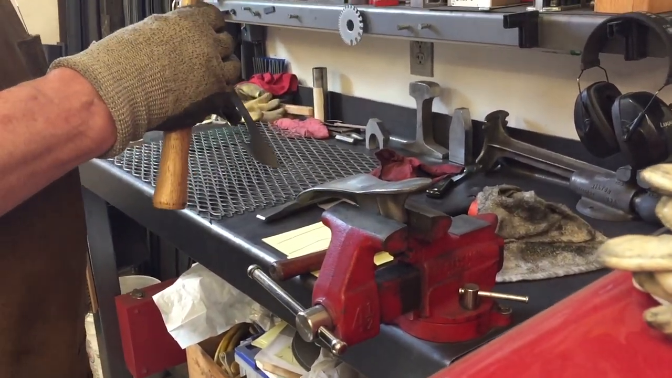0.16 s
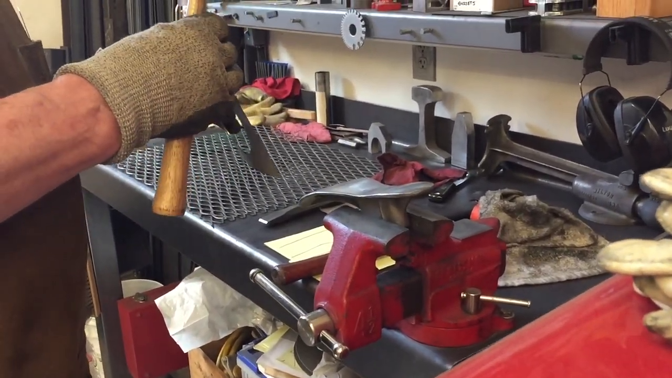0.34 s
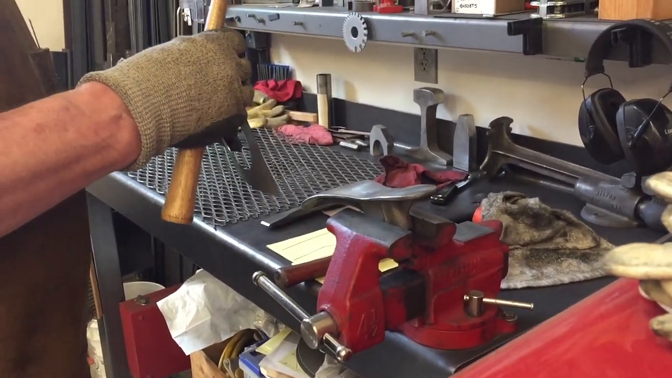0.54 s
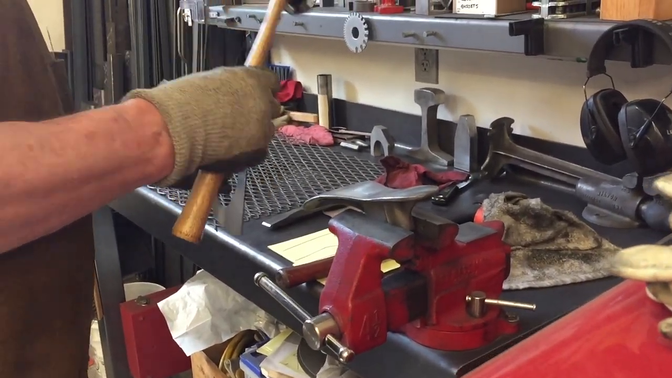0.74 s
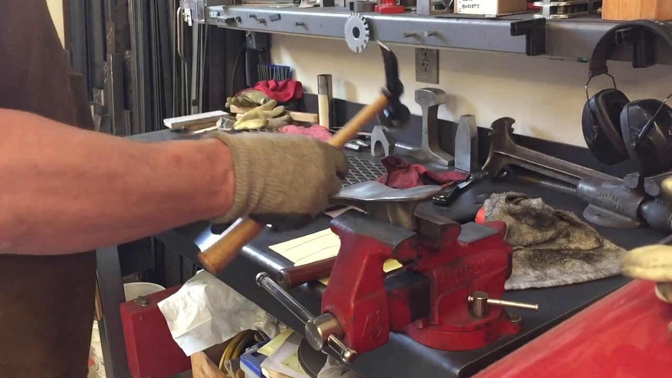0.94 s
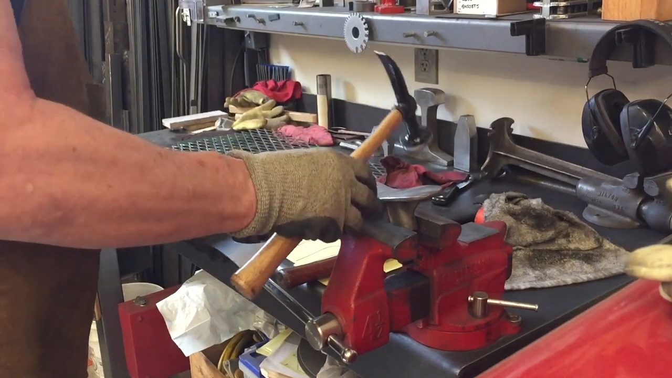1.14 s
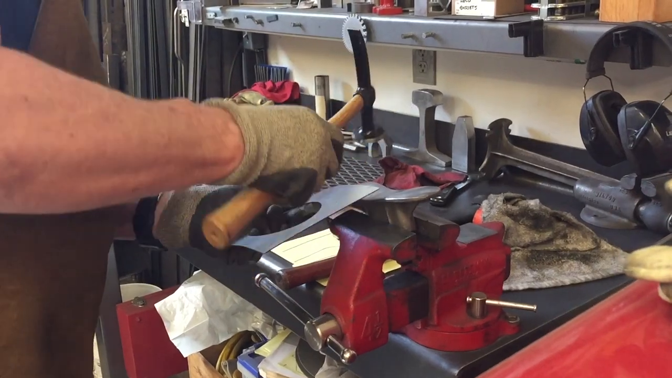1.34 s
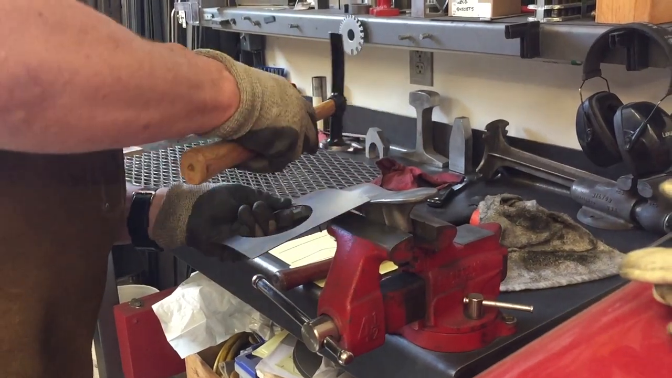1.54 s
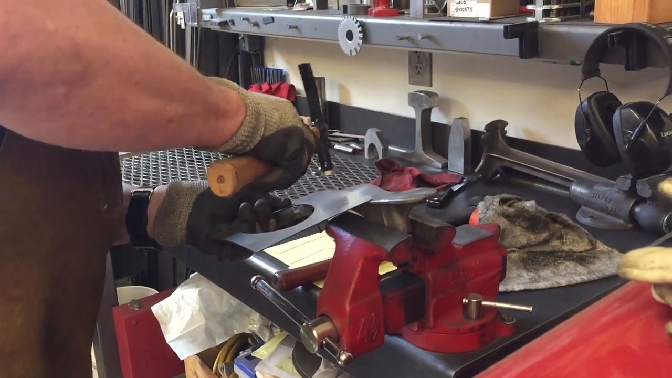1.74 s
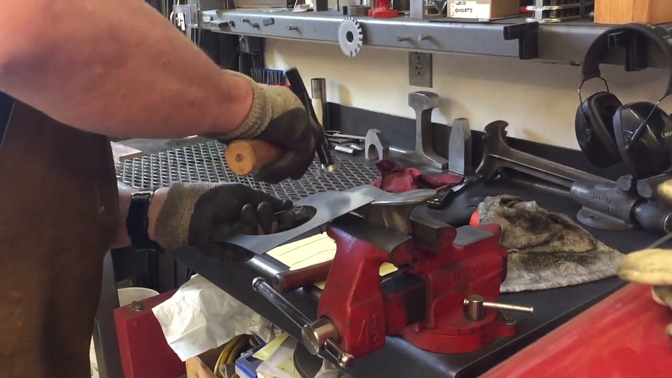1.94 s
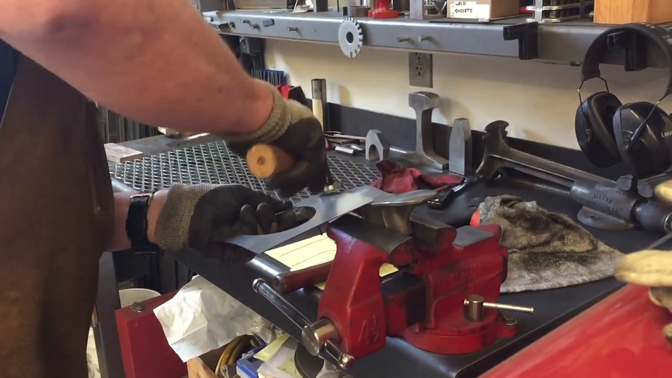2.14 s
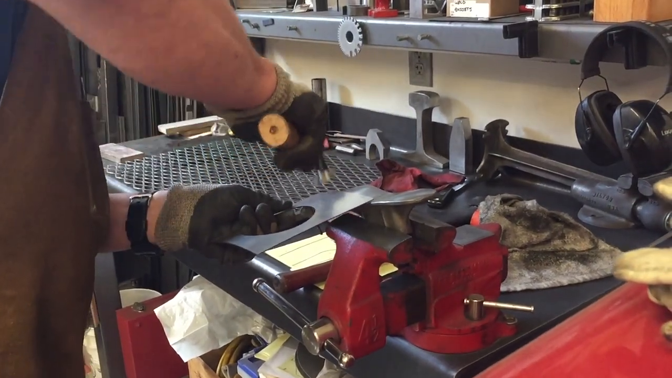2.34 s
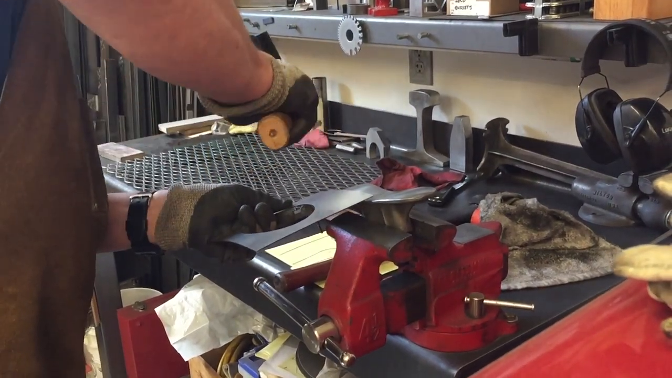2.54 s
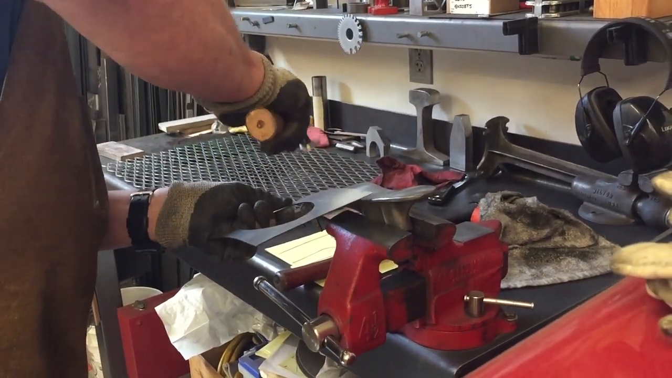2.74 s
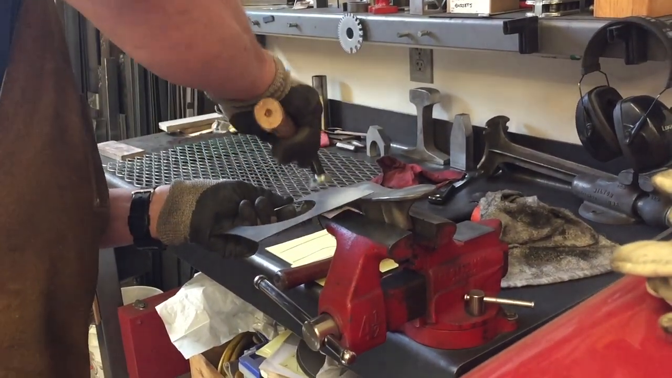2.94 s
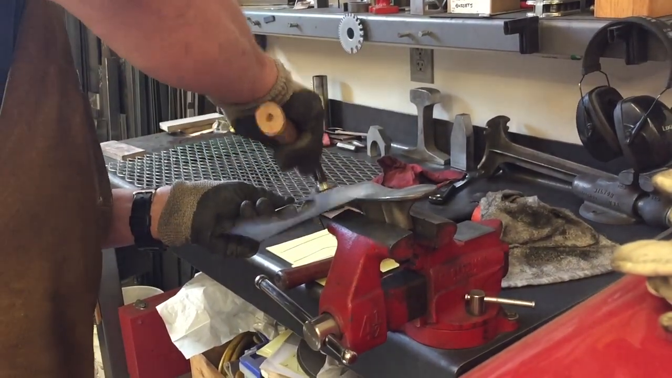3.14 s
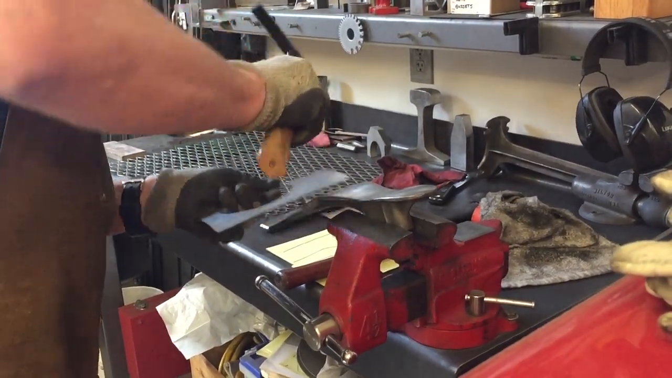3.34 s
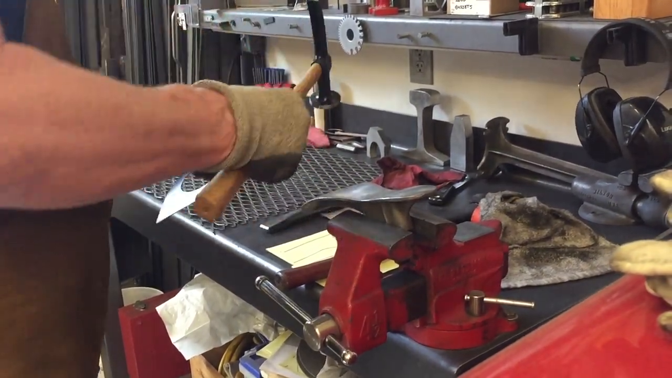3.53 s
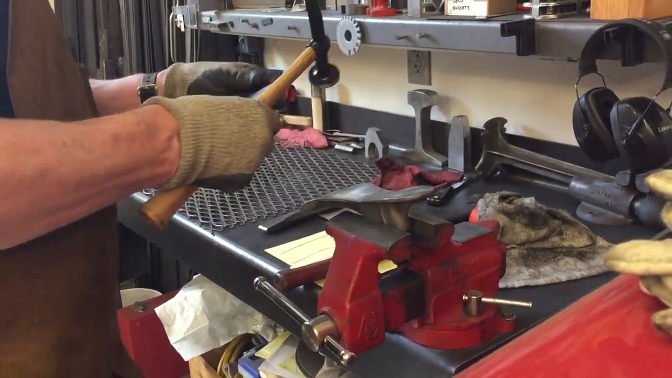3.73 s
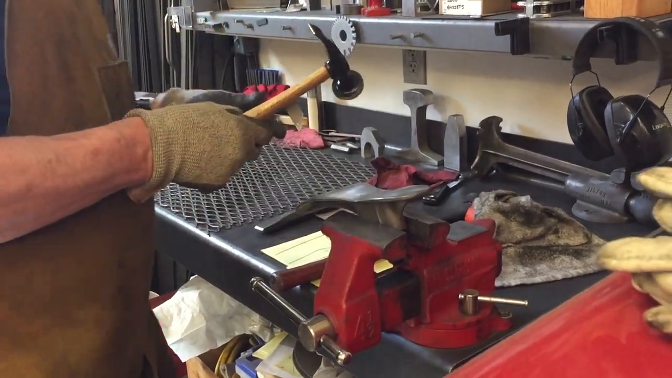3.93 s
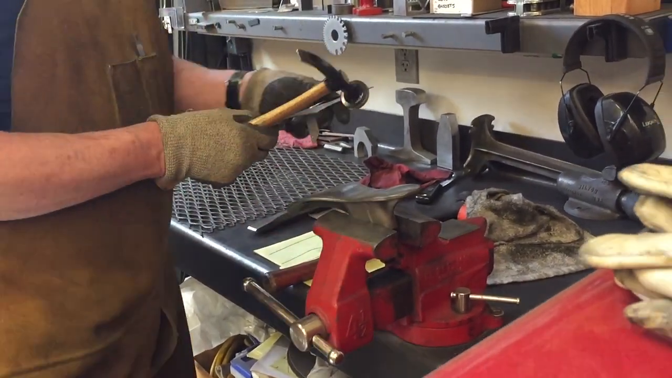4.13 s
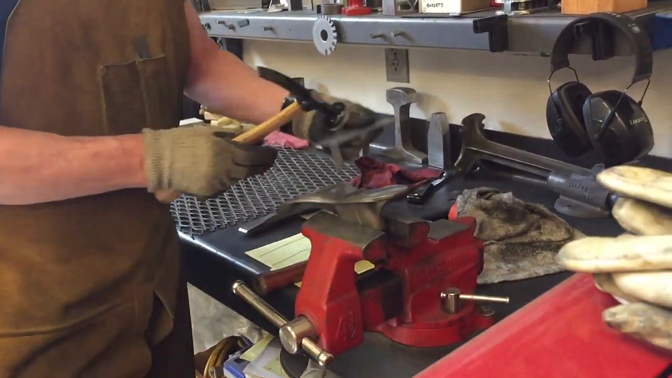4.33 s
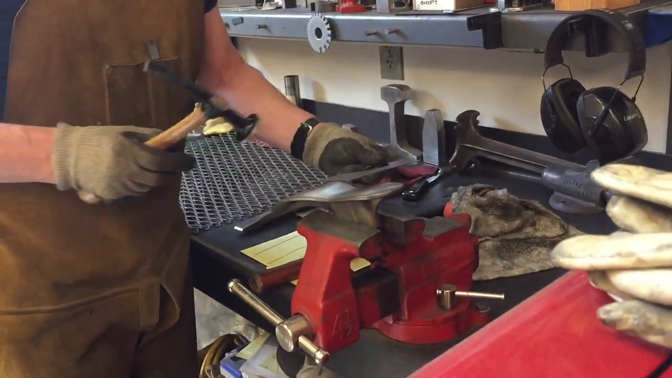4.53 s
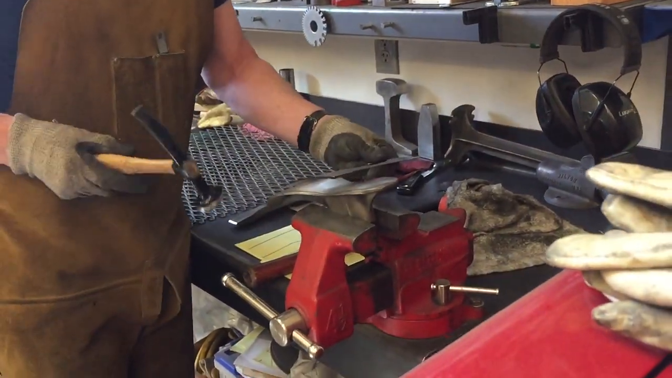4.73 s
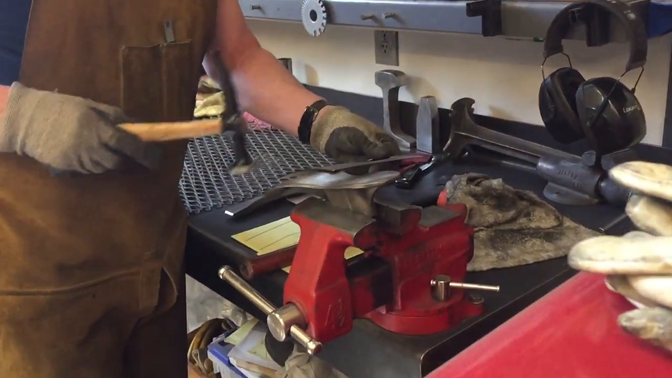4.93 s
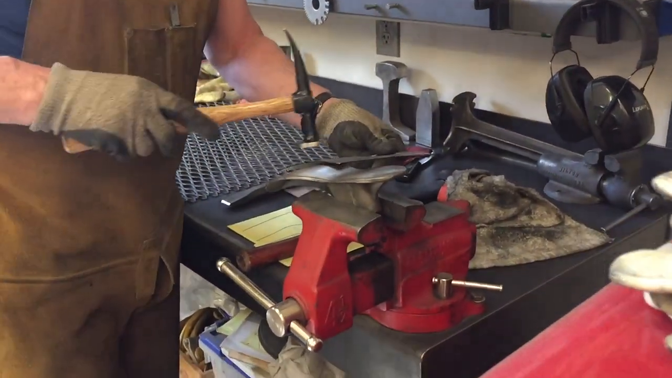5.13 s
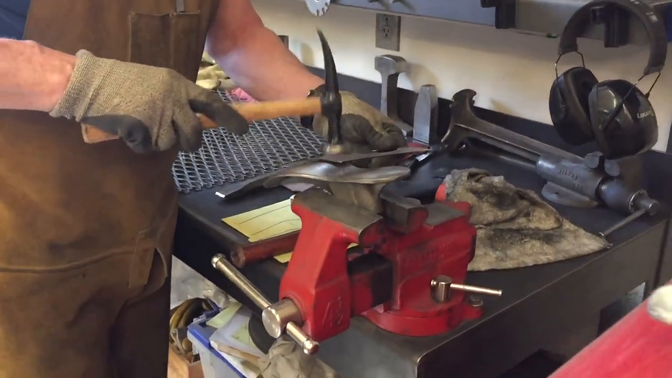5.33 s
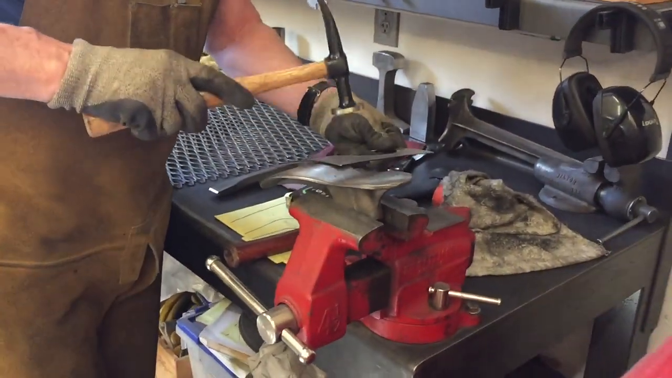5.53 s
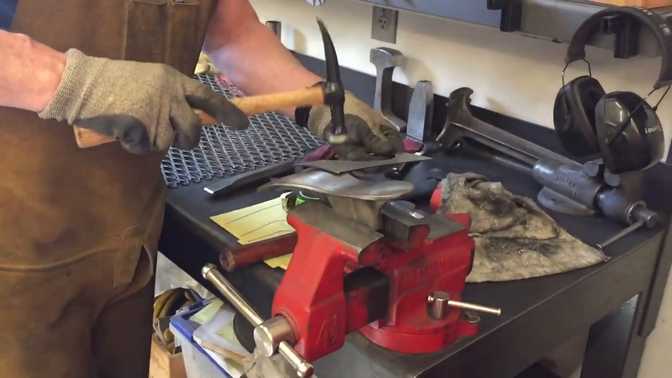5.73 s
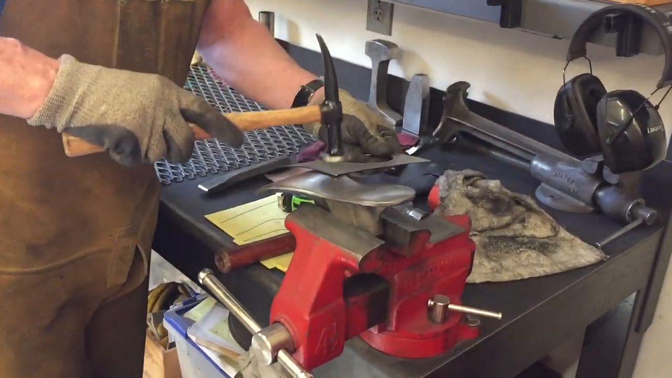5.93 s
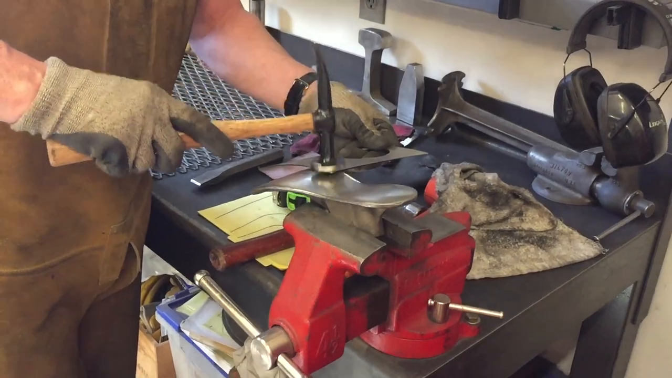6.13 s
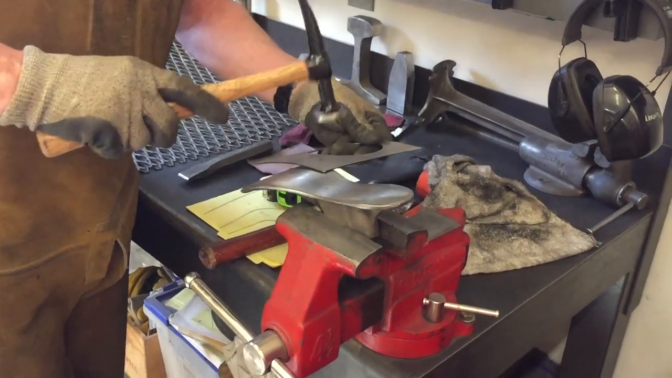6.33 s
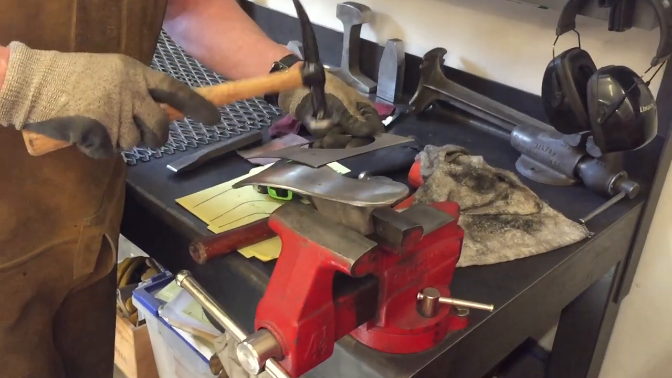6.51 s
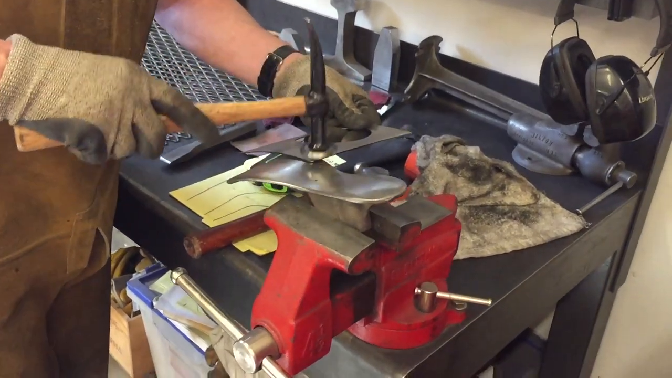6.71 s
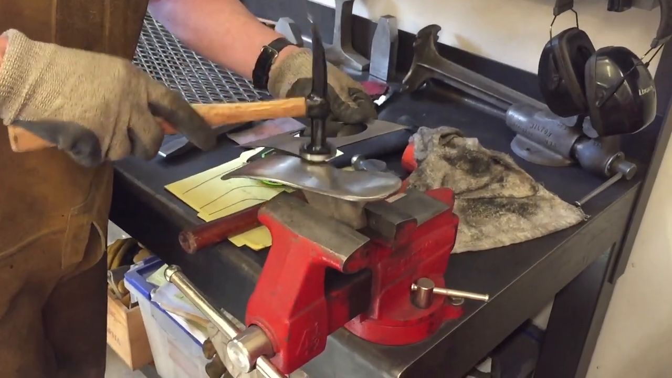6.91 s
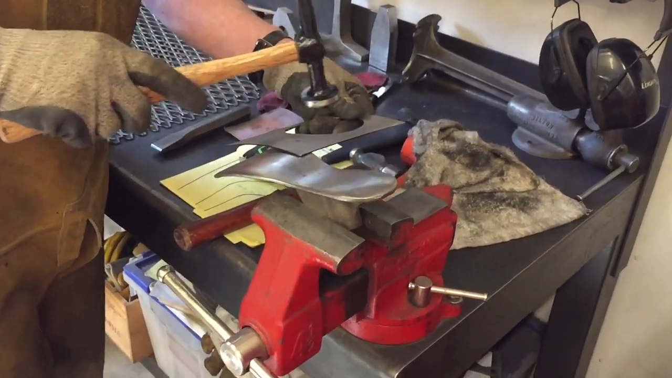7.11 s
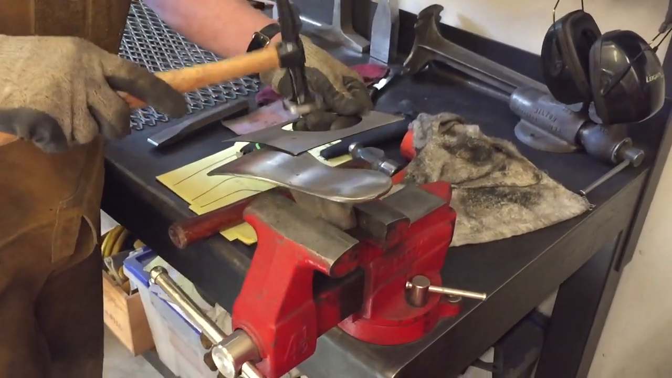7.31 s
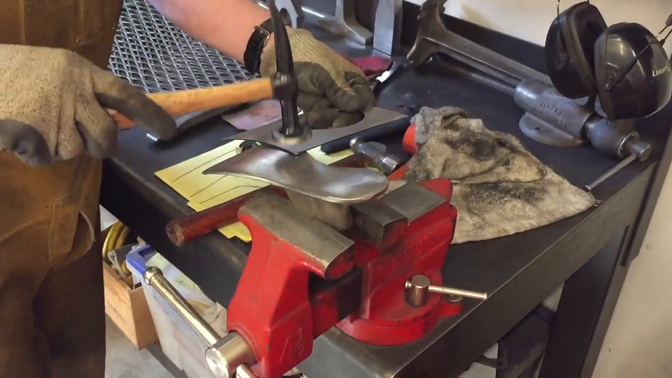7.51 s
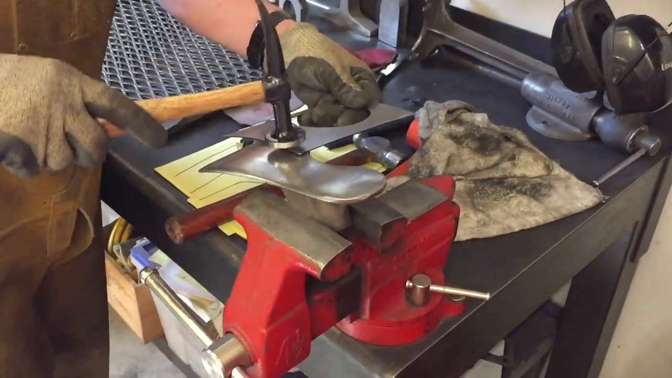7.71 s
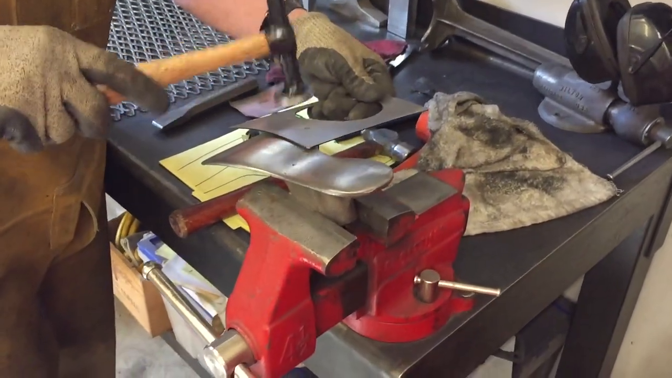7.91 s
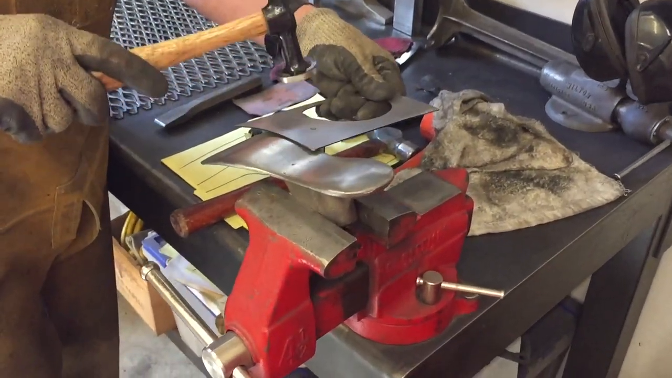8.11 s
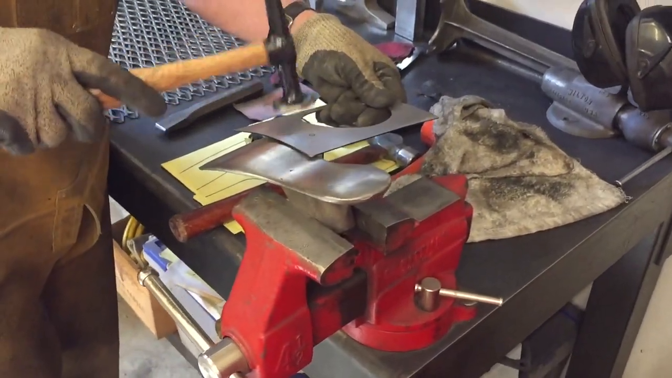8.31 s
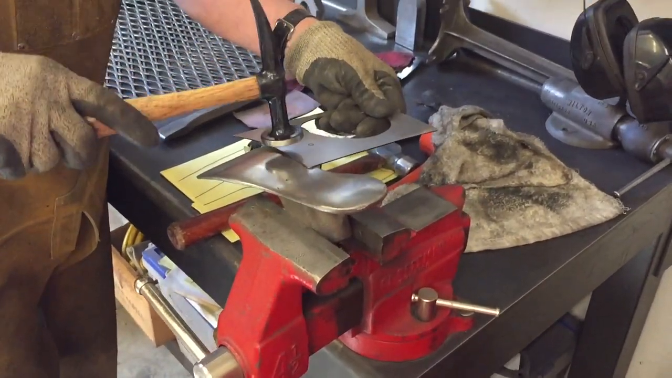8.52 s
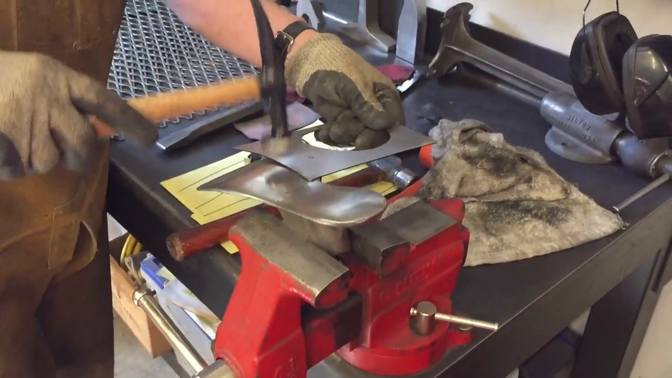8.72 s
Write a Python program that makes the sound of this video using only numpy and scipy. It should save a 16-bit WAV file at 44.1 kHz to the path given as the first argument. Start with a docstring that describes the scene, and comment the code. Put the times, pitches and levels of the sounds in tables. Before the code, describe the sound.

Metal sheet is laid down with clinks and scrapes, then hammered on a vise-held form in sharp, rattling, ringing blows about four a second.

```python
"""Hammering sheet steel at a vise

A body hammer shapes a piece of sheet steel on an iron form held in a bench vise, in a small workshop.
Each blow mixes bursts of shaped noise (crack, chatter, rumble) with fading sine waves (the rings of metal).
Before each run of blows the metal is slid about and laid down, with scrapes, clinks and soft bumps.
The room adds reverberation and quiet air; the hardest blows are clipped."""
import sys
import numpy as np
from scipy import signal
from scipy.fft import rfft, irfft, next_fast_len
from scipy.io import wavfile

SR = 44100
rng = np.random.default_rng(int(sys.argv[2]) if len(sys.argv) > 2 else 0)


def wav_record(signal):
    """Record a signal, one row per channel, as 16-bit PCM in the file named by sys.argv[1]."""
    frames = np.transpose(np.atleast_2d(signal))
    bounded = np.clip(frames, -1, 1)
    # unit amplitude maps onto the largest positive 16-bit level
    quanta = np.round(bounded * 32767).astype(np.int16)
    wavfile.write(sys.argv[1], SR, quanta)


N = 390726  # length of the scene in samples
T = np.arange(int(0.7 * SR)) / SR  # time within one short sound, s
PITCH_SCATTER = 0.015  # random spread of pitch from blow to blow, as a share of the pitch

# spectrum of the low rumble of a shaken bench: f/Hz, level per Hz/dB
THUD_SPECTRUM = [(28, -39), (48, -6.5), (70, 1), (95, -4.5), (125, -8), (180, -5.5), (230, -6), (340, -8),
                 (480, -25.5), (1500, -40)]


def hammering():
    """Every blow rings sheet, form, hammer head and bench, each as a set of fading modes."""
    # hammer blows: t/s, clang level/dB, squareness/-1 glancing to 1 flat on, hammer ring level/dB
    blows = [(1.9244, -3, 0.89, -29), (2.1868, 1, 0.87, -21), (2.4478, 3, -0.0042, -21),
             (2.7072, 4, -0.26, -30), (2.9736, 1, -0.69, -42), (3.236, 3, -0.59, -42),
             (5.441, -1.5, -0.48, -14), (5.7015, 1.5, 0.016, -11.5), (5.97, 1.5, -0.73, -8.5),
             (6.218, 1, 0.43, -10.5), (6.476, 1, 0.47, -11), (6.74, 1.5, 0.3, -22), (7.006, 1, 0.13, -28),
             (7.276, 1, -0.16, -31), (7.529, 1.5, -0.26, -10.5), (7.785, 0, -0.18, -26),
             (8.046, -3.5, -0.35, -9), (8.303, -1.5, -0.36, -12), (8.569, -2, -0.76, -34),
             (8.8245, 0.5, 0.48, -39)]
    # how firmly the hand seats the sheet on the form: t/s, seating/0 loose to 1 firm
    seating_curve = [(1.92, 0.009), (3.24, 0.1), (5.44, 0.38), (5.7, 0.65), (5.97, 0.43), (6.22, 0.81),
                     (6.48, 1), (7.53, .95), (8.3, 1), (8.82, 0.36)]
    # the microphone moves in towards the vise and hears more of its low end: t/s, level/dB
    bass_proximity = [(1.92, -0.5), (2.7, 2), (7.3, -1), (8.3, 1), (8.82, 5)]
    # ringing modes of the sheet, before they are split and shifted: f/Hz, level/dB, t60/s
    sheet_modes = [(1093, -16.5, 0.72), (1175, 3.5, 0.31), (1200, -10, 0.53), (1640, -11.5, 0.93),
                   (1860, -18.5, 0.26), (1916, 1, 0.63), (2370, -2.5, 0.67), (2660, -1, 0.35)]
    # ringing modes of the iron form, before they are split and shifted: f/Hz, level/dB, t60/s
    form_modes = [(3020, -6, 0.29), (3330, -8.5, 0.13), (3490, 2.5, 0.2), (3643, 2, 0.17),
                  (4000, -12.5, 0.41), (3880, -2.5, 0.15), (4290, -5, 0.25), (5420, -11, 0.15),
                  (5470, 0, 0.17), (5460, -30, 0.62), (6570, -14.5, .3), (7760, -11.5, 0.46)]
    # ringing modes of the hammer head: f/Hz, level/dB, t60/s
    hammer_modes = [(7900, -17, 0.24), (8060, -20, 0.41), (8380, 2, 0.11), (9110, -20, .15),
                    (9070, -8, 0.27), (11278, -7, .1), (12107, -15, .1), (14000, -7, .11)]
    # ringing modes of the bench: f/Hz, level/dB, t60/s
    bench_modes = [(59.7, -12.5, 0.81), (77, 1, 0.13), (79, 4, 0.31), (108.9, -8, 0.78), (150.5, -2, 0.51),
                   (180.2, 1, .3), (655.4, 1, 0.24)]

    out, count = np.zeros(N), len(blows)
    sheet = strikes(split(sheet_modes, count=3, width=0.008), count)
    plate = strikes(plate_modes(count=400, t60=0.18, tilt_db=-1.5, damping=0.75), count)
    form = strikes(split(form_modes, count=5, width=0.018), count)
    head = strikes(hammer_modes, count)
    bench = strikes(bench_modes, count)
    for k, (s, clang_db, squareness, head_db) in enumerate(blows):
        seating = np.interp(s, *np.transpose(seating_curve))
        clang = blow(seating, np.clip(squareness, -1, 1), sheet[k], plate[k], form[k])
        head_ring = undb(head_db) * head[k] * swell(0.002)
        add(out, s, undb(clang_db) * (clang + head_ring))
        bass_db = np.interp(s, *np.transpose(bass_proximity))
        add(out, s, undb(bass_db) * thud(seating, bench[k]))
    return out


def blow(seating, squareness, sheet, plate, form):
    """The clang of one blow: a firm sheet rings louder and lower, and stops chattering sooner than a loose one."""
    # spectrum of the dull chatter: f/Hz, level per Hz/dB
    clatter_spectrum = [(150, -17), (450, -16), (900, -8), (1120, -3), (1350, -5), (1600, -2.5),
                        (2200, -6.5), (2600, -4), (3000, -10.5), (4300, -14), (6000, -18), (12000, -43)]
    # spectrum of the bright chatter: f/Hz, level per Hz/dB
    buzz_spectrum = [(1200, -12.5), (3000, -1), (4200, 4.5), (5000, -3.5), (5700, 3.5), (7000, -0.5),
                     (8400, 5.5), (10300, -7), (11500, 0.5), (14400, -6), (16000, -29.5)]

    # base time in s, from which the chatter lengths and the build-up of the rings follow
    settle_s = seated(seating, loose=0.029, firm=0.0066)
    # the free part of the sheet changes as it is moved over the form, and its modes shift with it
    bend_scatter, ring_scatter = 1 + PITCH_SCATTER * rng.standard_normal(2)
    bend_hz = seated(seating, loose=1777, firm=1532.6) * bend_scatter
    shift = bend_hz / 1660
    high_bend = undb(6.5) * tone(bend_hz, t60=0.075)
    low_bend = undb(-4) * tone(1147 * shift ** 0.6, t60=0.18)
    sheet_ring = undb(-11) * retune(sheet, ring_scatter ** 0.5)
    plate_ring = undb(-7) * retune(plate, shift ** 0.5)
    rings = (sheet_ring + plate_ring + high_bend + low_bend) * swell(0.17 * settle_s)
    form_ring = retune(form, ring_scatter ** 0.5) * swell(0.001)

    clatter = undb(5) * noise(clatter_spectrum) * chatter(1.29 * settle_s, first_db=-10.5, t60=0.18)
    buzz = noise(buzz_spectrum) * chatter(0.87 * settle_s, first_db=-1, t60=0.099)
    contact = crack(hold_s=0.0016, t60=0.011, scatter_db=-20, scatter_t60=0.17)

    # a flat blow cracks and rings the form more, and buzzes less
    crack_db = seated(seating, loose=-8, firm=1) + 5.5 * squareness
    clatter_db = seated(seating, loose=-23.5, firm=-10)
    buzz_db = seated(seating, loose=-23, firm=-6) - 5.5 * squareness
    form_db = seated(seating, loose=-35.5, firm=-7.5) + 7.5 * squareness
    return (undb(crack_db) * contact + undb(clatter_db) * (clatter + rings)
            + undb(buzz_db) * buzz + undb(form_db) * form_ring)


def crack(hold_s, t60, scatter_db, scatter_t60):
    """Steel meets steel: a short bright burst of noise, then its scatter off vise and bench."""
    # spectrum of steel on steel: f/Hz, level per Hz/dB
    crack_spectrum = [(30, -28.5), (130, -15), (450, -6.5), (1000, -12), (2000, -1.5), (4000, -2),
                      (6000, -3.5), (8700, 3.5), (10500, -0.5), (14000, 0.5), (16000, -10.5)]
    burst = fade(t60, T - hold_s)  # full level for hold_s, then fading
    scatter = undb(scatter_db) * fade(scatter_t60)
    return noise(crack_spectrum) * (burst + scatter)


def chatter(length_s, first_db, t60):
    """Loudness of the sheet's rattle: it grows until the sheet seats on the form, then dies away."""
    growth = undb(first_db * np.maximum(1 - T / length_s, 0))
    return growth * fade(t60, T - length_s)


def plate_modes(count, t60, tilt_db, damping):
    """The crowd of higher plate modes: evenly dense, weaker and shorter towards the top."""
    hz = np.linspace(1000, 15000, count) + rng.uniform(-25, 25, count)
    octaves = np.log2(hz / hz[0])
    spread = np.exp(0.22 * rng.standard_normal(count))
    return np.transpose([hz, tilt_db * octaves, t60 * spread * np.exp(-damping * octaves)])


def thud(seating, bench):
    """The hammer's weight drums the sheet; vise and bench start moving a little later, and loose tools rumble."""
    # the drum mode is fully stiffened at a seating of 0.7
    drum_hz = seated(seating / 0.7, loose=260.3, firm=304.7) * (1 + PITCH_SCATTER * rng.standard_normal())
    drum = tone(drum_hz, t60=0.17) * swell(0.01)
    rumble = undb(-1) * noise(THUD_SPECTRUM) * fade(0.32)
    shaking = (bench + rumble) * swell(0.021)
    drum_db = seated(seating, loose=-24, firm=-14)
    bench_db = seated(seating, loose=-15.5, firm=-17.5)
    return undb(drum_db) * drum + undb(bench_db) * shaking


def seated(seating, loose, firm):
    """The value between that of a loose and that of a firm sheet."""
    return np.interp(seating, (0, 1), (loose, firm))


def slaps():
    """The sheet slaps back on the form, steel on steel, with a short crack."""
    # slaps: t/s, level before a common 3 dB boost/dB
    slap_list = [(1.9569, -22.5), (2.224, -23.5), (2.4958, -16), (2.7456, -11.5), (2.985, -7),
                 (3.012, -16.5), (3.2744, -16), (5.456, -15.5)]
    out = np.zeros(N)
    for s, db in slap_list:
        add(out, s, undb(db + 3) * crack(hold_s=0.002, t60=0.017, scatter_db=-12.5, scatter_t60=0.11))
    return out


def touchdowns():
    """Pieces touch down with a tick and a clink; the loose panel wobbles and drums, and the bench knocks."""
    # touchdowns: t/s, edge clink level/dB, loose panel level/dB, drum level/dB, drum mode f/Hz
    taps = [(1.169, -23, -38.5, -24, 266.3), (1.325, -41, -25.5, -24.5, 277.5),
            (1.612, -45.5, -46, -66, 263), (4.522, -22, -27.5, -35.5, 234), (4.688, -43, -42, -39.5, 238),
            (4.767, -16.5, -31.5, -28.5, 257)]
    # ringing modes of a clinking edge, before they are split: f/Hz, level/dB, t60/s
    clink_modes = [(499, -22, 0.095), (1090, -4, 0.43), (1546, -4, 0.47), (2095, -2, 0.38), (2560, 5, 0.23),
                   (2720, -1, .28), (3170, -3, .25), (3760, 6.5, 0.21), (4120, -2, 0.29), (5300, -9, 0.63),
                   (6000, -1.5, 0.23), (6760, -8, .3), (7300, -2.5, 0.25), (8200, 2.5, .2),
                   (10400, -11, 0.49), (10900, -21, 0.18), (13300, -13, 0.15)]
    # ringing modes of the loose panel, before they are split: f/Hz, level/dB, t60/s
    panel_modes = [(667, -4, 0.22), (1115, -5, 0.21), (1215, -7.5, 0.68), (1330, -7.5, 0.54),
                   (1710, -0.5, 0.25), (1856, -7, .35), (1970, -0.5, 0.18), (2270, -4.5, .2)]

    out, count = np.zeros(N), len(taps)
    clink = strikes(split(clink_modes, count=6, width=0.035), count)
    panel = strikes(split(panel_modes, count=6, width=0.025), count)
    for k, (s, edge_db, panel_db, drum_db, drum_hz) in enumerate(taps):
        tick = crack(hold_s=0.00056, t60=0.14, scatter_db=-12.5, scatter_t60=0.092)
        wobble = panel[k] * swell(0.001)
        drum = tone(drum_hz, t60=0.44) * swell(0.026)
        add(out, s, undb(edge_db) * (tick + undb(-5) * clink[k]))
        add(out, s, undb(panel_db) * (wobble + bump(knock_db=4, boom_db=-9)))
        add(out, s, undb(drum_db) * drum)
    return out


def bench_bumps():
    """Soft bumps on the bench, without any ring of metal."""
    # bumps: t/s, knock level/dB, boom level/dB
    bumps = [(3.986, -33, -47.5), (4.071, -39.5, -43), (4.85, -38, -29.5), (4.905, -49, -31),
             (5.131, -52, -46)]
    out = np.zeros(N)
    for s, knock_db, boom_db in bumps:
        add(out, s, bump(knock_db, boom_db))
    return out


def bump(knock_db, boom_db):
    """The bench top knocks, then its frame booms."""
    # spectrum of the knocking bench top: f/Hz, level per Hz/dB
    knock_spectrum = [(80, -17.5), (190, -15.5), (240, -6.5), (310, -9), (380, -22), (520, -18),
                      (1000, -19.5), (3000, -42), (10000, -70)]
    knock_noise = undb(-5) * noise(knock_spectrum) * fade(0.11) * swell(0.003)
    knock_tone = undb(3) * tone(hz=257, t60=0.036) * swell(0.0038)
    boom_noise = undb(-2.5) * noise(THUD_SPECTRUM) * fade(0.2)
    boom_tone = undb(4) * tone(hz=90.2, t60=0.22)
    boom = (boom_noise + boom_tone) * swell(0.005)
    return undb(knock_db) * (knock_noise + knock_tone) + undb(boom_db) * boom


def slides():
    """Metal slides over metal: scraping noise whose level wavers at random with the grip of the edges."""
    # slides: t/s, length/s, level/dB
    slide_list = [(1.064, 0.16, -53.5), (1.702, 0.048, -63), (3.758, 0.041, -57.5), (4.122, 0.13, -52),
                  (4.287, 0.19, -38.5), (4.434, 0.15, -46.5)]
    # spectrum of scraping edges: f/Hz, level per Hz/dB
    scrape_spectrum = [(200, -32), (800, -15), (1700, -10.5), (2200, -4), (2600, -0.5), (3200, -0.5),
                       (3900, -7.5), (5500, -8), (9000, -10), (15000, -25)]
    out = np.zeros(N)
    for s, length_s, db in slide_list:
        size = int(length_s * SR)
        grip_points = np.linspace(0, size, num=24)
        grip_db = 1.2 * np.interp(np.arange(size), grip_points, rng.standard_normal(24))
        stroke = np.hanning(size) ** 0.5  # fades in and out
        add(out, s, undb(db) * noise(scrape_spectrum, size) * stroke * undb(grip_db))
    return out


def workshop(x):
    """Diffuse reflections from hard walls and tools; the treble dies first."""
    # reverberation bands: f/Hz, level against the direct sound/dB, t60/s
    room = [(59.7, -10.5, 1), (170, -6.5, 1), (444, -3, 0.86), (1180, -5, 0.85), (2920, -9, 0.86),
            (5440, -8, 0.77), (7400, -16, 0.75), (11100, -16, 0.49), (16000, -10.5, 0.2)]
    hz, db, t60 = np.transpose(room)
    t = np.arange(SR) / SR
    log_f = np.log(np.maximum(np.fft.rfftfreq(SR, 1 / SR), 1))
    white, response = rfft(rng.standard_normal(SR)), 0
    # each band is full at its own frequency and falls to nothing at its neighbours
    for k, corner in enumerate(np.eye(len(hz))):
        band = irfft(white * np.interp(log_f, np.log(hz), corner), SR)
        tail = fade(t60[k], t) * (1 - np.exp(-(t / 0.0045) ** 2))
        response = response + undb(db[k]) * band * tail / np.linalg.norm(tail)
    return signal.fftconvolve(x, response)[:N]


def room_air():
    """The quiet air of the room: steady noise, strongest in the bass."""
    # spectrum of the air: f/Hz, level per Hz/dB
    air_spectrum = [(15, -44.5), (25, -20), (99, 0.5), (145, -4.5), (270, -2.5), (439, -9), (754, -8),
                    (6920, -19), (14400, -23), (16000, -31)]
    return undb(-63) * noise(air_spectrum, N)


def undb(db):
    """Decibels to gain."""
    return 10 ** (np.asarray(db) / 20)


def fade(t60, t=T):
    """Exponential decay, 60 dB down after t60 seconds."""
    return np.exp(-np.log(1000) * np.maximum(t, 0) / t60)


def swell(rise_s):
    """Smooth build-up from 0 towards 1."""
    return 1 - np.exp(-(T / rise_s) ** 2)


def tone(hz, t60):
    """A single fading mode: one sine wave."""
    return np.sin(2 * np.pi * hz * T) * fade(t60)


def noise(spectrum, size=len(T)):
    """Noise of rms 1 with the given spectrum."""
    hz, db = np.transpose(spectrum)
    n = next_fast_len(size)
    f = np.maximum(np.fft.rfftfreq(n, 1 / SR), 1)
    gain = undb(np.interp(np.log(f), np.log(hz), db))
    x = irfft(rfft(rng.standard_normal(n)) * gain, n)[:size]
    return x / x.std()


def strikes(modes, count):
    """One ring per strike, starting at about rms 1; each strike point weights the modes differently."""
    hz, db, t60 = np.transpose(modes)
    t = T.astype(np.float32)
    angle = np.float32(2 * np.pi * hz[:, None]) * t
    decay = np.exp(np.float32(-np.log(1000) / t60[:, None]) * t)
    gain = undb(db + 2 * rng.standard_normal((count, len(hz))))
    gain = gain * np.sqrt(2 / np.sum(gain ** 2, axis=1, keepdims=True))
    phase = rng.uniform(0, 2 * np.pi, gain.shape)
    # a cosine and a sine part together give every mode its random phase
    cosine_part = np.float32(gain * np.cos(phase)) @ (decay * np.cos(angle))
    sine_part = np.float32(gain * np.sin(phase)) @ (decay * np.sin(angle))
    return cosine_part + sine_part


def split(modes, count, width):
    """Bent and clamped metal has each mode split into close partners that beat."""
    rows = np.repeat(np.array(modes, float), count, axis=0)
    jitter = rng.uniform(-1.1, 1, len(rows)) / count
    offset = np.tile(np.linspace(-1, 1, count), len(modes)) + jitter
    rows[:, 0] *= 1 + width * offset
    rows[:, 1] -= 4 * np.abs(offset)  # outer partners are weaker, dB
    return rows


def retune(ring, ratio):
    """The same ring played faster or slower, which moves every mode and its decay by one ratio."""
    return np.interp(T * ratio, T, ring, right=0)


def add(track, s, sound):
    """Mix a sound into the track at time s in seconds."""
    i = int(s * SR)
    track[i:i + len(sound)] += sound[:N - i]


def scene():
    """The work at the bench, its reverberation and the quiet air of the room."""
    direct = hammering() + slaps() + touchdowns() + bench_bumps() + slides()
    return (direct + workshop(direct) + room_air())[None]


def record(dry):
    """The loudest peaks are flattened; the deep bass and the top are cut off."""
    flattened = dry / (1 + (dry / 1.2) ** 6) ** (1 / 6)  # never passes 1.2
    bass_cut = signal.butter(2, 38, "high", fs=SR, output="sos")
    top_cut = signal.ellip(8, 0.1, 50, 16000, fs=SR, output="sos")
    lean = signal.sosfilt(bass_cut, flattened)
    return signal.sosfiltfilt(top_cut, lean)


dry = scene()
out = record(dry)
wav_record(out)
```